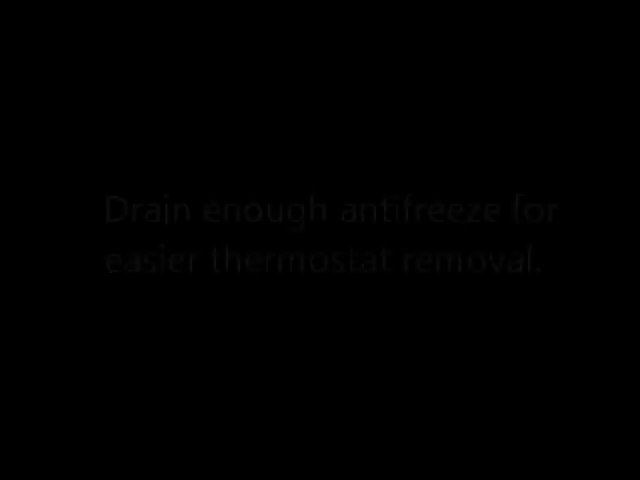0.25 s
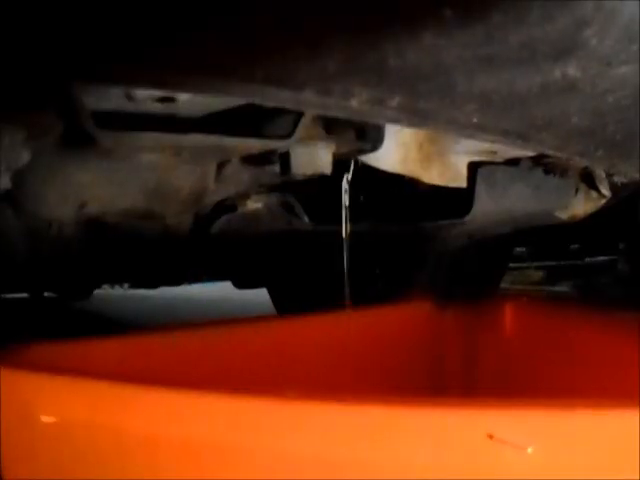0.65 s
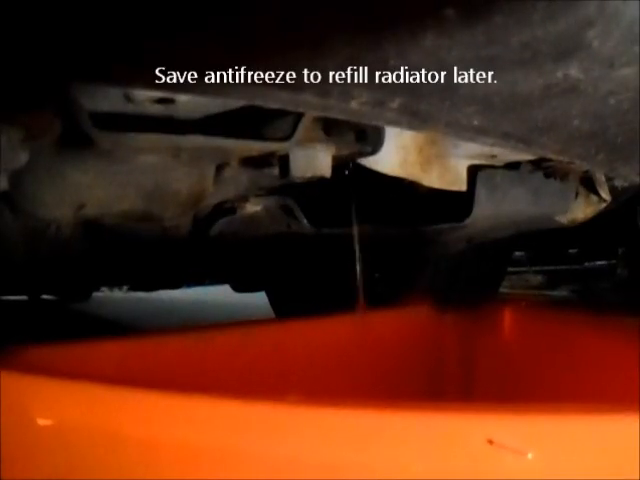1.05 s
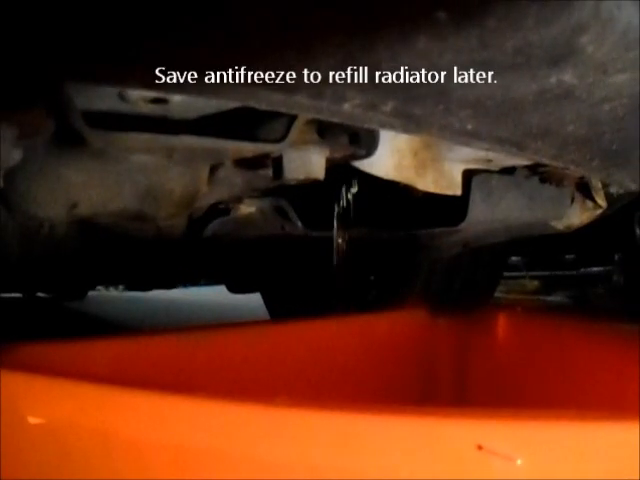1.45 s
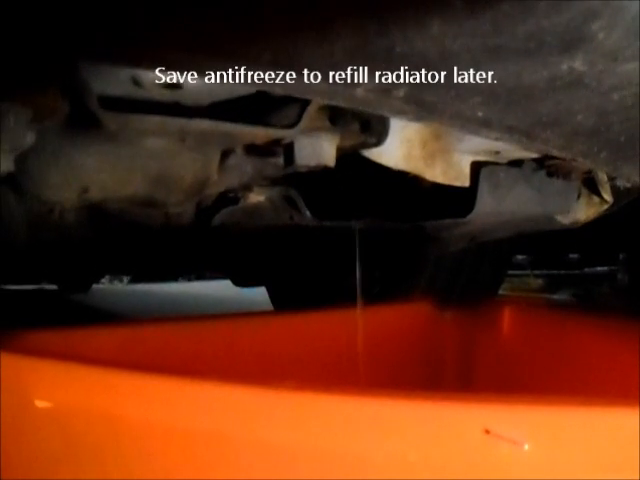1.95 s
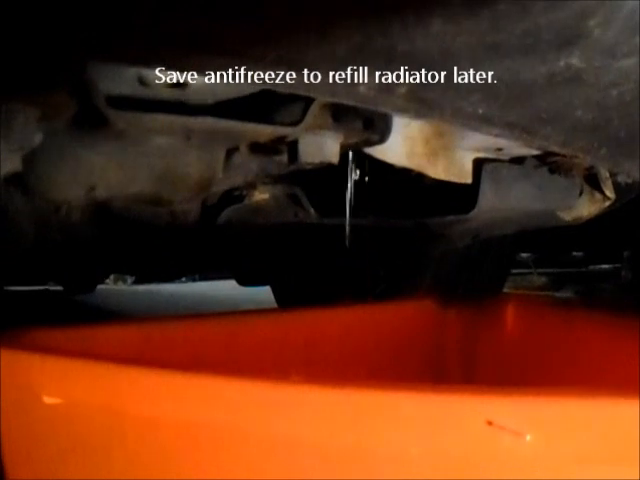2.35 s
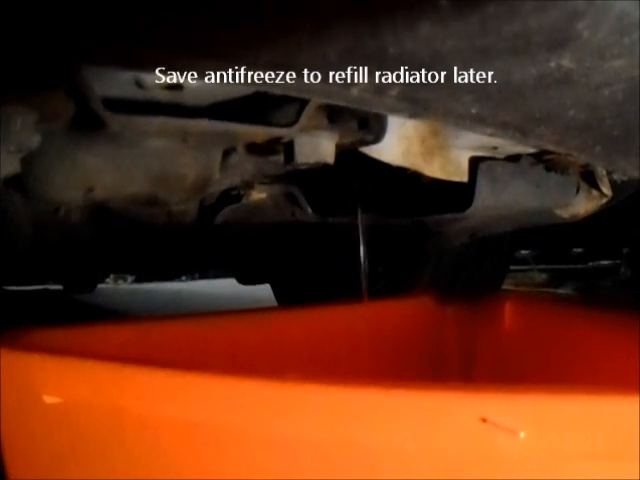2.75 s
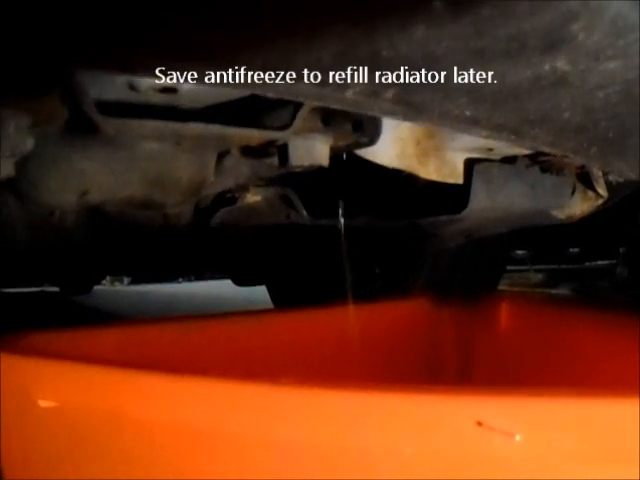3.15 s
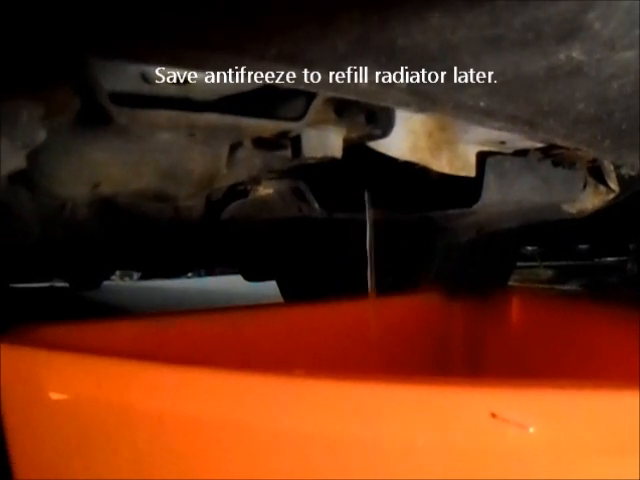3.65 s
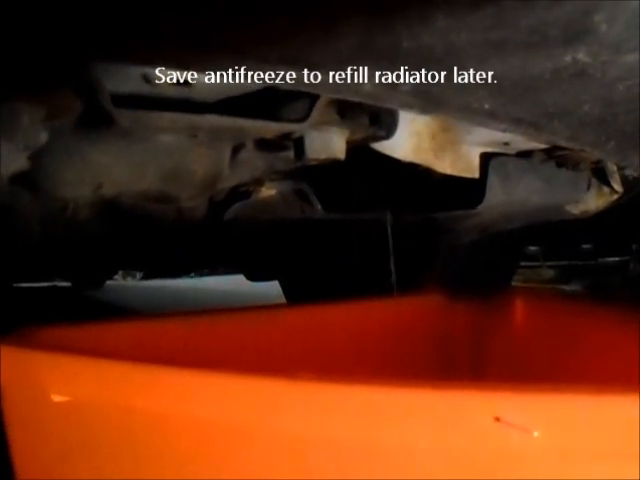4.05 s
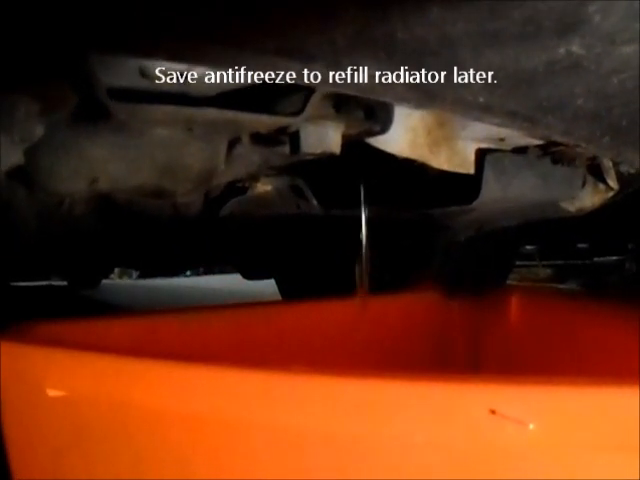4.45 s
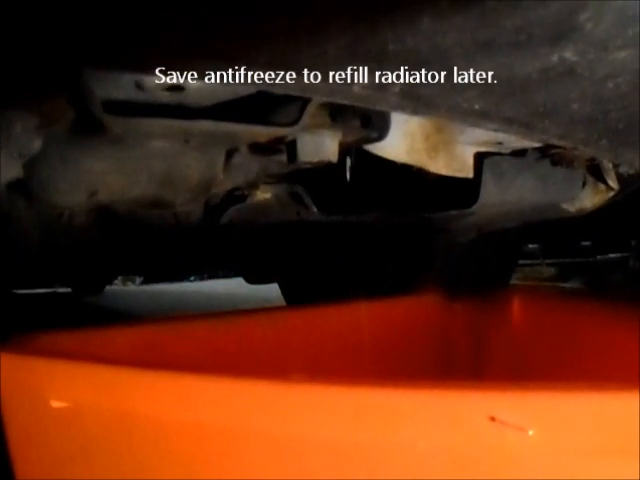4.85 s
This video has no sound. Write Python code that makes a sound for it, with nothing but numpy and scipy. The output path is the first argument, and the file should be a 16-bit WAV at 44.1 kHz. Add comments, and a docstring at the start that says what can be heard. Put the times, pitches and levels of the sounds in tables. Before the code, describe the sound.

Close, muffled sound of liquid dribbling into a plastic pan in a garage. A short blank silence ends with a sharp click far louder than everything after it. Then many uneven drops tap the hollow pan, with fine spray patter, tiny hissing splashes, trailing droplets and watery bubble plinks. The flow surges and thins without stopping. Quiet low rumble stays underneath, with a brief dull reflection and little high treble.

```python
"""Garage: a thin, broken stream of coolant falls from a car's radiator into a plastic drain pan.
A sharp click opens the sound; low rumble and faint hiss run beneath. Drops tap the pan and ring its modes,
each with a hissing splash, a low gulp, crackling bubbles and trailing droplets; fine spray patters between.
Some trapped bubbles plink as gliding sines. The room adds a dull tail; little remains above 5.5 kHz."""
import sys
import numpy as np
from scipy import signal
from scipy.fft import rfft, irfft, next_fast_len
from scipy.io import wavfile
from scipy.ndimage import uniform_filter1d

SR = 44100
rng = np.random.default_rng(int(sys.argv[2]) if len(sys.argv) > 2 else 0)


def unload_wav(signal):
    """Save mono or channel-first audio to the path in sys.argv[1] as 16-bit WAV at rate SR, clipped to [-1, 1]."""
    wavfile.write(
        sys.argv[1],
        SR,
        np.round(np.clip(np.atleast_2d(signal).T, -1, 1) * 32767).astype(np.int16),
    )


N = 225510

# larger drops striking the pan: t/s, relative level/dB, brightness/(dB per octave)
DROP_TABLE = [(0.4249, -34.5, -5), (0.5469, -39, -5), (0.591, -42.5, 0), (0.6082, -23.0, 0.5),
              (0.68, -37.5, -1), (0.7142, -34, -3), (0.7364, -40.5, 0), (0.7441, -39, -2.5),
              (0.798, -37.5, -1.0), (0.8297, -35.5, -2), (0.8398, -35.5, -3), (0.8579, -38, -1.5),
              (0.9218, -31.5, -3), (0.979, -32, -0.5), (0.991, -32, 1), (1.0692, -39, -3),
              (1.0765, -36, -2.5), (1.0999, -29.5, -3), (1.1089, -25.5, -0.5), (1.1665, -34, -5),
              (1.2009, -29.0, -2.5), (1.2292, -34, -7), (1.3045, -34.5, -4), (1.3307, -35.5, -5.5),
              (1.3564, -37, -3), (1.3796, -24, -1), (1.415, -35, -1.5), (1.6055, -32.5, -2),
              (1.6401, -34.5, -3.5), (1.6481, -34, -3.0), (1.7088, -36, -3), (1.7774, -35.5, -0.5),
              (1.7875, -40, 1.5), (1.9622, -34, -5), (1.9819, -34.5, -2.0), (2.0576, -19, 1.0),
              (2.0927, -33.5, -5), (2.1428, -42.5, -1), (2.248, -34.5, -3), (2.2905, -33, -3.0),
              (2.371, -33, -8), (2.4126, -32.5, -3), (2.5175, -35.5, -3.5), (2.545, -41.5, -7),
              (2.5707, -36.0, -2.5), (2.5971, -40.5, -3.5), (2.8229, -38, -4), (2.8392, -31.5, -8),
              (2.9096, -33, 0), (3.086, -39, -4), (3.1384, -40.5, -4.5), (3.1596, -35, -5),
              (3.185, -40, -4), (3.2313, -38.5, -3.0), (3.2403, -38.5, 1.5), (3.2894, -38.5, -5),
              (3.3692, -39, -6.5), (3.402, -37.5, -9), (3.4177, -35.5, -8.5), (3.4628, -28.5, 2.5),
              (3.5098, -37, -4.5), (3.5887, -31.5, -0.5), (3.7016, -37.5, -3.0), (3.7418, -31, -4.5),
              (3.7944, -31.5, -4.0), (3.8071, -33.5, -1), (3.8526, -33.5, -0.5), (3.8714, -39.5, -0.5),
              (3.9536, -40, -1), (3.9647, -34, -5), (3.9802, -33.5, -2.5), (4.0128, -41, 3.5),
              (4.0205, -34.0, -1), (4.061, -35.5, -2), (4.0683, -36, -1.5), (4.0883, -41, -3.5),
              (4.306, -28.0, 0.5), (4.3728, -38.5, -4), (4.396, -36, -2), (4.5227, -38.5, -5.0),
              (4.5964, -30, -4), (4.6311, -45, 6), (4.663, -39, -2.5), (4.691, -26, 0), (4.7981, -36, -2),
              (4.8562, -36, 0), (4.9216, -40, -4), (4.9361, -39.5, -9.5), (5.0787, -37, -3.5)]
# modes of the wet plastic pan: f/Hz, relative level/dB, t60/s
PAN_MODES = [(151, -19, .07), (321, -18.5, 0.22), (444.6, -16.5, 0.13), (538.6, -20, 0.14),
             (660, -13.5, 0.062), (787.5, -2, 0.063), (873.6, 0, 0.032), (994, -3.5, 0.042),
             (1176, -29.5, 0.23), (1308, -11, 0.053), (1471, -10, 0.021), (1690, -16, 0.029),
             (1875, -8.5, 0.037), (2092, -10.5, 0.031), (2232, -3, 0.012), (2579, -11, 0.037),
             (2808, -3.5, 0.0083), (3006, -13, .026), (3210, -14.5, 0.021), (3505, -13.5, .026),
             (3873, -21, 0.043), (4185, -24, 0.028), (4460, -28, 0.038), (4910, -22, 0.021)]
# trapped air bubbles: t/s, f at crest/Hz, ring level/dB, t60/s, glide/(octaves per s)
BUBBLE_TABLE = [(0.4356, 3910, -35.5, 0.029, -8), (1.2053, 1480, -25.5, 0.025, 1),
                (1.473, 1483, -28, 0.063, 6), (1.816, 2150, -31, .034, -3), (2.1198, 5170, -49.5, 0.04, -3),
                (2.4042, 1518, -27.5, 0.058, 0), (2.664, 1374, -26.5, 0.086, 7.5),
                (2.858, 4490, -49, 0.065, 6.5), (2.99, 1675, -28, 0.028, -6.5),
                (4.123, 5170, -47.5, .02, 4), (4.338, 4900, -48, .02, 3), (4.4205, 3550, -36, .022, -32),
                (4.6837, 2120, -33.5, 0.026, -12.5), (4.6898, 2000, -32, .026, -5),
                (4.955, 1536, -28, 0.07, 1.5)]
# surging and thinning stream: t/s, relative spray level/dB
STREAM_FLOW = [(0.42, -42.5), (0.54, -58), (0.78, -50), (1.03, -60.5), (1.42, -53), (1.6, -67), (1.9, -43),
               (2.16, -73.5), (2.58, -60), (2.8, -48), (3.12, -69), (3.3, -44), (3.52, -55), (3.77, -46.5),
               (3.91, -68), (4.02, -54.5), (4.58, -49), (5.1, -53.5)]
# spectrum of the garage background: f/Hz, relative level/dB
GARAGE_SPECTRUM = [(15, -12.5), (30, -5.5), (50, -3), (78, 3.5), (105, -6.5), (150, -4.5), (240, -10),
                   (335, -9), (560, -20.5), (880, -20.5), (1300, -26), (2500, -30.5), (5200, -34.5),
                   (8000, -51.5)]

TIME_S = np.arange(N) / SR
RING_S = np.arange(int(.16 * SR)) / SR
START_S = .3884
CLICK_DB, CLICK_WIDTH_S = -.62, .00029
GARAGE_DB = -47.5
ROOM_DB, ROOM_T60_S = -17.5, 0.17
# bubble swell time as a share of t60; splash equals ring at this pitch and gains on it above
SWELL_SHARE = 0.039
SPLASH_EQUAL_HZ, SPLASH_DB_PER_OCTAVE = 4200, 9
BAND_HZ, TRACE_DB, TOP_HZ = 5330, -37, 15500


def undb(db):
    """Decibels to gain."""
    return 10 ** (np.asarray(db) / 20)


def rms(x):
    """Root mean square along the last axis."""
    return np.sqrt(np.mean(x ** 2, axis=-1, keepdims=True))


def fade(t_s, t60_s):
    """Exponential decay: 60 dB in t60_s."""
    return np.exp(-np.log(1000) * t_s / np.maximum(t60_s, 1e-3))


def place(times_s, sounds):
    """Add each short sound to the time line at its moment."""
    out = np.zeros(N + len(RING_S))
    for s, sound in zip(times_s, sounds):
        i = int(np.clip(s * SR, 0, N - 1))
        out[i:i + len(sound)] += sound
    return out[:N]


def walk(rate_hz):
    """Smoothed random wander, spread near 1."""
    k = int(SR / rate_hz)
    steps = np.repeat(rng.standard_normal(N // k + 1), k)
    smooth = uniform_filter1d(uniform_filter1d(steps, k), k)
    return 1.3 * smooth[:N]


def lowpass(x, order, cutoff_hz):
    """Butterworth low-pass, causal."""
    return signal.sosfilt(signal.butter(order, cutoff_hz, fs=SR, output="sos"), x)


def click():
    """One dry, square pulse at the start."""
    edge_s = CLICK_WIDTH_S / 2 - abs(TIME_S - START_S)
    return undb(CLICK_DB) * np.clip(edge_s * SR + .5, 0, 1)


def garage(waver_db):
    """Low rumble with faint hiss: shaped noise whose level wavers slightly."""
    hz, db = np.transpose(GARAGE_SPECTRUM)
    bins_hz = np.maximum(np.fft.rfftfreq(N, 1 / SR), 1)
    colour = undb(np.interp(np.log(bins_hz), np.log(hz), db))
    noise = irfft(rfft(rng.standard_normal(N)) * colour, N)
    return noise / rms(noise) * undb(GARAGE_DB + waver_db * walk(7.33))


def struck(rings, late_hz):
    """Gather ring energy at the start, as close to the blow; in thin plastic the lows travel slower."""
    size = next_fast_len(len(RING_S), real=True)
    gain = abs(rfft(rings, size))
    # minimum phase by folding the cepstrum
    cepstrum = irfft(np.log(gain + 1e-4 * gain.max(axis=1, keepdims=True)), size)
    cepstrum[:, 1:size // 2] *= 2
    cepstrum[:, size // 2 + 1:] = 0
    # all-pass lag delays the lows
    lag_rad = 2 * np.arctan(np.fft.rfftfreq(size, 1 / SR) / late_hz)
    return irfft(np.exp(rfft(cepstrum) - 1j * lag_rad), size)[:, :len(RING_S)]


def pan_rings(tilt_db, scatter_db, detune):
    """Pan modes struck once per drop; each landing spot weights the modes differently."""
    hz, db, t60_s = np.transpose(PAN_MODES)
    chance = rng.standard_normal((len(tilt_db), len(hz) + 1))
    # neighbouring modes swing in opposite directions
    sign = (-1) ** np.arange(len(hz))
    sines = np.sin(2 * np.pi * hz[:, None] * RING_S)
    modes = sign[:, None] * sines * fade(RING_S, t60_s[:, None])
    # bare plastic: bright; cushioned by liquid: dull
    octaves = np.log2(np.maximum(hz, 300) / 800)
    mode_db = db + tilt_db[:, None] * octaves + scatter_db * chance[:, 1:]
    rings = struck(undb(mode_db) @ modes, late_hz=1560)
    # the sloshing load shifts the pan's pitch a little
    stretch = 1 + detune * chance[:, 0]
    rings = np.array([np.interp(RING_S * k, RING_S, ring) for k, ring in zip(stretch, rings)])
    attack = int(.0045 * SR)
    return rings / rms(rings[:, :attack])


def spray(gain_db, spread_db, tilt_db, count, spot_count):
    """Fine droplets ring a handful of spots at random, harder when the stream runs stronger."""
    spots = pan_rings(tilt_db + np.linspace(-2, 2, spot_count), scatter_db=3.5, detune=0.0045)
    when, strength, spot = rng.random((count, 3)).T
    s = START_S + (TIME_S[-1] - START_S) * when
    db = np.interp(s, *np.transpose(STREAM_FLOW)) + gain_db + spread_db * (strength - 1)
    index = (spot * spot_count).astype(int)
    return place(s, (gain * spots[k] for gain, k in zip(undb(db), index)))


def room(x):
    """Diffuse reflections from car underside and garage, which soak up the treble."""
    t_s = TIME_S[:SR // 2]
    onset = 1 - np.exp(-(t_s / 0.0037) ** 2)
    tail = rng.standard_normal(len(t_s)) * fade(t_s, ROOM_T60_S) * onset
    dull = lowpass(x, 2, 3200)
    return undb(ROOM_DB) * signal.fftconvolve(dull, tail / np.linalg.norm(tail))[:N]


def drops(gain_db):
    """Larger drops tap the pan one by one and ring its modes."""
    s, db, tilt_db = np.transpose(DROP_TABLE)
    rings = pan_rings(tilt_db, scatter_db=2.5, detune=0.0098)
    return place(s, undb(db + gain_db)[:, None] * rings)


def splashes(gain_db, t60_s, low_hz, high_hz, rough_db):
    """Each drop's crown breaks into a short, grainy hiss, duller where the drop was cushioned."""
    s, db, tilt_db = np.transpose(DROP_TABLE)
    t_s = RING_S[:len(RING_S) // 2]
    hz = np.maximum(np.fft.rfftfreq(len(t_s), 1 / SR), 1)
    band = 1 / np.sqrt((1 + (low_hz / hz) ** 4) * (1 + (hz / high_hz) ** 3))
    colour = band * undb(tilt_db[:, None] * np.log2(np.clip(hz, 800, 5000) / 800))
    noise, grain = rng.standard_normal((len(s), 2, len(t_s))).transpose(1, 0, 2)
    # clumps of about 2 ms
    clump = int(.002 * SR)
    clumps = np.sqrt(clump) * uniform_filter1d(grain, clump)
    hiss = irfft(rfft(noise * undb(rough_db * clumps)) * colour, len(t_s))
    return place(s, undb(db + gain_db)[:, None] * hiss / rms(hiss) * fade(t_s, t60_s))


def gulps(gain_db, hz, crest_s, follow, heavy_db):
    """The pan's hollow answers each drop with a low, late-swelling gulp; dull, heavy drops move it most."""
    s, db, tilt_db = np.transpose(DROP_TABLE)
    pitch_hz = hz * 2 ** (0.14 * rng.standard_normal((len(s), 1)))
    swell = (RING_S / crest_s * np.exp(1 - RING_S / crest_s)) ** 3
    size_db = gain_db + follow * (db - db.mean()) - heavy_db * tilt_db
    return place(s, undb(size_db)[:, None] * swell * np.sin(2 * np.pi * pitch_hz * RING_S))


def fizz(gain_db, spread_db, cycles, lag_s, count):
    """Drop splashes throw off tiny bubbles: decaying sine grains that crackle just after."""
    parent, delay, strength, pitch = rng.random((count, 4)).T
    s, db, _ = np.array(DROP_TABLE)[(parent * len(DROP_TABLE)).astype(int)].T
    hz = (1400 + 4000 * pitch)[:, None]
    t_s = RING_S[:len(RING_S) // 8]
    grains = np.sin(2 * np.pi * hz * t_s) * fade(t_s, cycles / hz)
    size_db = gain_db + db / 2 + spread_db * (strength - 1)
    # exponential delays, mean lag_s
    return place(s - lag_s * np.log(1 - delay), undb(size_db)[:, None] * grains)


def trailers(gain_db, spread_db, tilt_db, gap_s, trail_s, follow, count):
    """The thread behind each drop breaks into small droplets that ring the pan just after it."""
    s, db, _ = np.transpose(DROP_TABLE)
    delay, strength = rng.random((len(s), 2, count)).transpose(1, 0, 2)
    when_s = s[:, None] + gap_s + trail_s * delay
    size_db = gain_db + follow * (db - db.mean())[:, None] + spread_db * (strength - 1)
    rings = pan_rings(np.full(when_s.size, float(tilt_db)), scatter_db=3, detune=0.014)
    return place(when_s.ravel(), undb(size_db).reshape(-1, 1) * rings)


def bubbles(crest_s, sag, flutter_db):
    """A cavity closes with a splash near its pitch; the trapped bubble swells into a gliding, fluttering ring."""
    s, hz, db, t60_s, glide = np.transpose(BUBBLE_TABLE)[:, :, None]
    # pitch arches around the crest, then holds from 26 ms
    t_s = np.minimum(RING_S, .026) - crest_s
    pitch_hz = hz * 2 ** (glide * t_s - sag * (t_s / crest_s) ** 2)
    tone = np.sin(2 * np.pi * np.cumsum(pitch_hz, axis=1) / SR)
    decay = fade(RING_S, t60_s)
    shape = (1 - np.exp(-RING_S / (SWELL_SHARE * t60_s))) * decay
    ring = shape / shape.max(axis=1, keepdims=True)
    # ragged splash, grains of about 0.5 ms
    grain = int(.0005 * SR)
    ragged = np.sqrt(grain) * uniform_filter1d(rng.standard_normal(ring.shape), grain)
    splash_db = SPLASH_DB_PER_OCTAVE * np.log2(hz / SPLASH_EQUAL_HZ)
    splash = undb(splash_db) * ragged * decay
    plinks = place(s[:, 0], undb(db) * (ring + splash) * tone)
    return plinks * undb(flutter_db * walk(600))


def echoes(x, db, count):
    """Pan walls and car throw plinks back, duller, within milliseconds, so their tails waver."""
    lags = (rng.uniform(.004, .022, count) * SR).astype(int)
    dull = lowpass(x, 2, 2300)
    return undb(db) * sum(np.pad(dull, (lag, 0))[:N] for lag in lags)


def scene():
    """Silence, a click, then coolant pattering in the garage."""
    plinks = bubbles(crest_s=0.0093, sag=0.064, flutter_db=2.0)
    liquid = drops(gain_db=-2.5) + plinks + echoes(plinks, db=-16.0, count=4)
    liquid += splashes(gain_db=-12.5, t60_s=0.055, low_hz=385, high_hz=1900, rough_db=2.5)
    liquid += gulps(gain_db=-50.0, hz=360.7, crest_s=.014, follow=0.6, heavy_db=0.5)
    liquid += trailers(gain_db=-40, spread_db=14, tilt_db=-2.0, gap_s=.004, trail_s=.018, follow=0.44, count=2)
    liquid += spray(gain_db=5.5, spread_db=20, tilt_db=-2.43, count=900, spot_count=40)
    liquid += fizz(gain_db=-28.0, spread_db=18.5, cycles=13, lag_s=0.042, count=600)
    sound = liquid + room(liquid) + garage(waver_db=1.22)
    return (sound * (TIME_S > START_S) + click())[None]


def record(dry):
    """Narrow-band recorder: steep treble cut plus a faint trace above it, clipped near full scale."""
    narrow = signal.sosfiltfilt(signal.butter(18, BAND_HZ, fs=SR, output="sos"), dry)
    trace = undb(TRACE_DB) * lowpass(dry, 1, BAND_HZ)
    clipped = np.clip(narrow + trace, -.97, .97)
    return signal.sosfilt(signal.ellip(8, .2, 70, TOP_HZ, fs=SR, output="sos"), clipped)


dry = scene()
out = record(dry)
unload_wav(out)
```